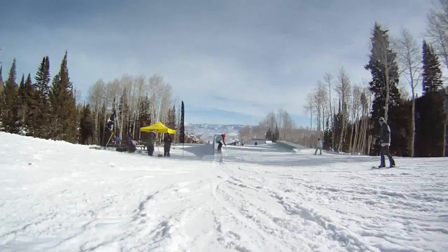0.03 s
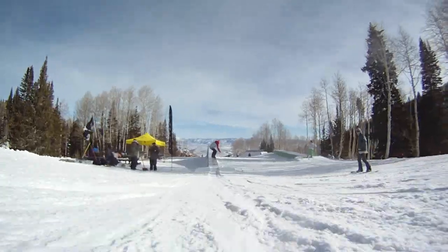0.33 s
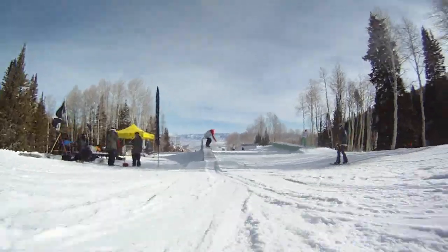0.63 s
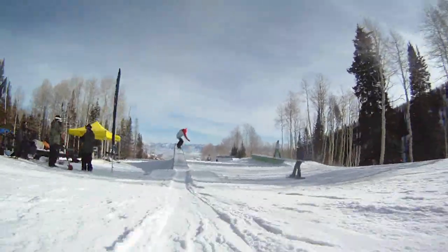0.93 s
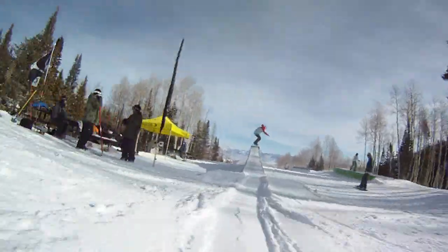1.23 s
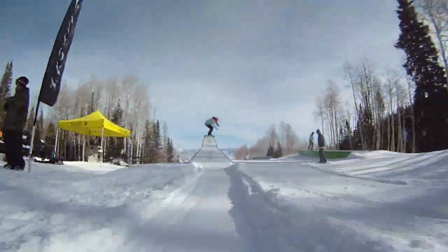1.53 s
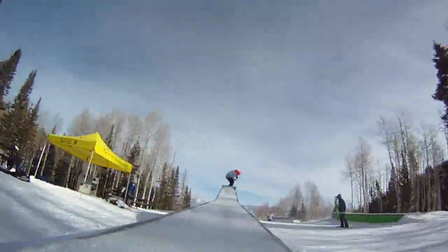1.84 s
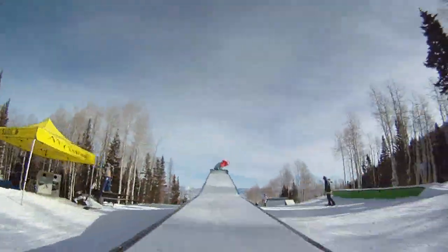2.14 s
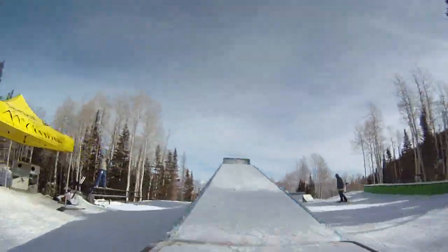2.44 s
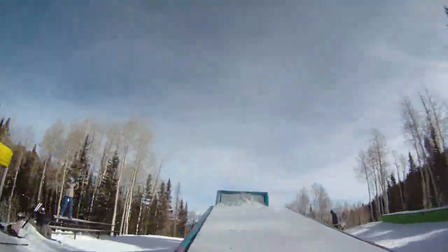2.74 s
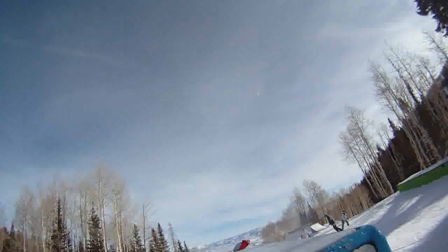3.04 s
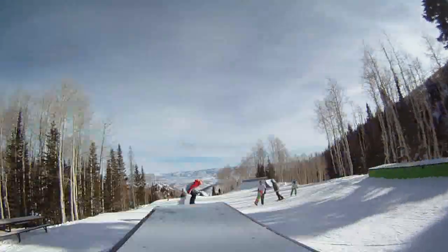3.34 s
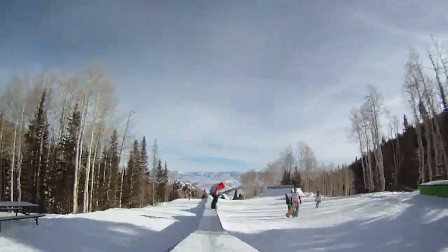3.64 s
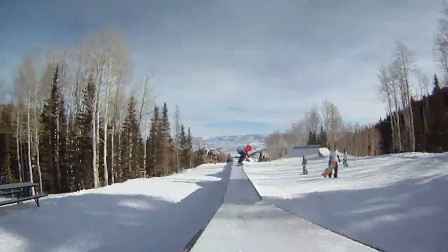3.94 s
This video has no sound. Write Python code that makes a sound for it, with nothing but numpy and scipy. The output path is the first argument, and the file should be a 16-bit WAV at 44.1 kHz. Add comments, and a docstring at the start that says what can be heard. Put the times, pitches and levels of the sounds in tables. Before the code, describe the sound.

Gritty, hollow scraping of a snowboard is heard up close through a plastic housing, over low wind and rattling bumps. Sharp knocks mark a ramp, snow crumbs tick during a short flight, and a distorted landing leads into more sliding.

```python
"""A snowboard scrapes over packed snow, runs up a ramp, flies briefly and drops onto a box.
It carries a camera in a sealed plastic housing, and everything is heard through that shell, almost mono.
Snow grains rasp along the base and ring the housing; loose crumbs tap it; bumps shake the mount;
wind buffets underneath. Hard knocks at the ramp's edges and at the landing overload the recorder."""
import sys
import numpy as np
from scipy import signal
from scipy.fft import rfft, irfft
from scipy.io import wavfile
from scipy.ndimage import uniform_filter1d

SR = 44100
rng = np.random.default_rng(int(sys.argv[2]) if len(sys.argv) > 2 else 0)


def master_out(mix):
    """Clip the mix to full scale and print it as 16-bit PCM to the path in sys.argv[1]."""
    frames = np.transpose(np.atleast_2d(mix))
    ceiling = np.clip(frames, -1, 1)
    pcm = np.round(ceiling * 32767).astype(np.int16)
    wavfile.write(sys.argv[1], SR, pcm)


N = 176400
T = np.arange(N) / SR


def amp(db):
    """Decibels to gain."""
    return 10 ** (np.asarray(db) / 20)


def unit(x):
    """Scales to rms 1."""
    return x / np.sqrt(np.mean(x ** 2) + 1e-20)


def curve(rows, column=1):
    """One column of a time table, drawn as an automation line."""
    rows = np.asarray(rows)
    return np.interp(T, rows[:, 0], rows[:, column])


def add(mix, start_s, sound):
    """Mixes a sound in at its start time."""
    part = mix[round(start_s * SR):][:len(sound)]
    part += sound[:len(part)]


def response(spectrum, modes=(), size=8192):
    """Minimum-phase impulse response, energy 1, of a broad spectrum with resonances on top."""
    hz = abs(np.fft.fftfreq(size, 1 / SR))
    point_hz, point_db = np.transpose(spectrum)
    db = np.interp(np.log(hz + 1), np.log(point_hz + 1), point_db)
    for centre, width, lift in modes:
        db = db + lift / (1 + ((hz - centre) / width) ** 2) ** 2
    minimum_phase = np.exp(signal.hilbert(np.log(amp(db))).conj())
    impulse = np.fft.ifft(minimum_phase).real[:size // 2] * np.hanning(size)[size // 2:]
    return impulse / np.linalg.norm(impulse)


def through(x, impulse):
    """Passes a sound through an impulse response."""
    return signal.fftconvolve(x, impulse)[:len(x)]


def coloured_noise(spectrum):
    """A noise bed with the given tone colour."""
    return through(rng.standard_normal(N), response(spectrum))


def wander(rate_hz):
    """Random modulation, rms 1, rolling off above the rate."""
    hz = np.fft.rfftfreq(N, 1 / SR)
    band = (hz > rate_hz / 10) / np.sqrt(1 + (hz / rate_hz) ** 4)
    return unit(irfft(rfft(rng.standard_normal(N)) * band, N))


def steady(x, window):
    """Holds the running level of a noise near rms 1; the window is in samples."""
    power = uniform_filter1d(uniform_filter1d(x ** 2, window), window)
    return x / np.sqrt(abs(power) + 1e-12)


def burst(t, rise_s, hold_until_s, fall_s):
    """Envelope with a linear attack and an exponential tail."""
    return np.minimum(t / rise_s, 1) * np.exp(-np.maximum(t - hold_until_s, 0) / fall_s)


def plastic_housing(damping=0):
    """Impulse response of the hollow shell; damping, 0 to 1, flattens its resonances."""
    # broad tone of the shell (frequency [Hz], level [dB])
    tone = [(60, -15), (250, -18.5), (480, -21.5), (800, -5.5), (1700, -5.5), (2900, -10.5), (3450, -18),
            (4300, -26), (6100, -42.5), (7700, -31), (9000, -20.5), (11000, -22), (11600, -41),
            (12400, -29), (12900, -18.5), (14700, -39.5), (15600, -47)]
    # its resonances (frequency [Hz], width [Hz], lift [dB])
    modes = [(280, 22.6, 16.8), (653, 101, 17.7), (1003, 79, 9.1), (1162.7, 158, 13.1), (2494, 227, 10.07),
             (3700, 136, 16.5), (5270, 110, 3), (6760, 82, 1.8), (8300, 117, 15.9), (9524, 224, 11.6),
             (10870, 190, 9.5), (12000, 140, 3.2), (13570, 250, 9.2), (15100, 200, 2.4)]
    return response(tone, [(hz, width, lift * (1 - damping)) for hz, width, lift in modes])


def flutter():
    """A faint low flutter that widens the rumble."""
    # low-mid hump (frequency [Hz], level [dB])
    tone = [(30, -57), (150, -3.5), (420, 18), (700, 0), (1100, -47), (3000, -60)]
    return amp(-61.5) * coloured_noise(tone)


def air():
    """Air hisses past one side of the housing, strongest in flight."""
    # colour of the slipstream (frequency [Hz], level [dB])
    tone = [(25, -2.5), (100, -10), (450, -16), (1000, -23), (4000, -37), (6500, -49), (10500, -34),
            (14000, -49)]
    # its swell (time [s], level [dB])
    swell = [(0, -90), (.2, -70), (3.12, -52), (3.2, -36), (3.46, -38.5), (3.52, -65), (4, -64)]
    return coloured_noise(tone) * amp(curve(swell))


def wind():
    """Gusts buffet the housing with a deep rumble."""
    # colour of the buffeting (frequency [Hz], level [dB])
    tone = [(8, -11), (20, 7.5), (40, -1), (60, -17), (100, -13.5), (300, -50.5), (2000, -125)]
    # gusts (time [s], relative level [dB])
    gusts = [(0.0, -107), (0.21, -30.5), (0.62, -14.5), (1.16, -18.5), (1.28, -10.5), (1.35, -28),
             (1.5, -16), (2.04, -12.5), (2.06, -19.5), (2.67, -30.5), (3.02, -20), (3.15, -9), (3.5, -21),
             (3.64, -32), (3.68, -18), (4.0, -24)]
    return steady(coloured_noise(tone), window=4000) * amp(curve(gusts) - 2.23)


def mount_shake():
    """Bumps in the snow keep the camera mount drumming in uneven jolts."""
    # boom of the mount (frequency [Hz], level [dB])
    tone = [(40, -30.5), (70, -12.5), (98, 1), (125, 4), (160, -10.5), (220, -25.5), (290, -27.5),
            (450, -37), (900, -68.5), (3000, -130)]
    # shaking, one list per stretch of the ride (time [s], relative level [dB])
    bumps = [
        [(0.15, -39), (0.234, -49), (0.262, -28), (0.86, -16.5), (0.884, -10.5), (0.964, -15), (1.148, -12.5),
         (1.212, -33.5), (1.25, -20)],
        [(1.27, -23), (1.294, -17.5), (1.39, -33.5), (1.472, -29), (1.49, -18.5), (1.656, -29), (1.7, -10.5),
         (1.96, -22), (2.02, -10.5)],
        [(2.07, -15.5), (2.114, -42), (2.244, -8), (2.268, -30), (2.314, -23.5), (2.392, -22.5), (2.456, -18.5),
         (2.612, -19.5), (2.68, -16.5)],
        [(2.74, -19.5), (2.79, -55), (2.87, -13), (2.942, -29.5), (3.064, -16.5), (3.188, -21.5), (3.21, -20.5),
         (3.372, -39), (3.47, -21)],
        [(3.54, -41), (3.572, -26), (3.636, -42), (3.652, -35), (3.754, -17.5), (3.78, -34.5), (3.904, -23),
         (3.92, -14.5), (4.0, -16.5)],
    ]
    drum = steady(coloured_noise(tone), window=1500)
    jolts_db = 4.24 * wander(rate_hz=8.6)
    return drum * amp(curve(np.concatenate(bumps)) + jolts_db - 1.78)


def snow_crumbs(housing):
    """Flying crumbs of snow hit the housing as tiny bright taps."""
    # taps (time [s], peak [dB])
    taps = [(2.131, -38), (2.164, -37), (2.744, -42), (3.184, -26), (3.201, -14), (3.257, -19.5),
            (3.269, -18), (3.335, -23), (3.357, -21), (3.363, -25), (3.365, -26), (3.421, -23)]
    decay_s, brightness = 0.00048, 0.16
    lowpass = signal.butter(2, 5500, fs=SR)
    t = T[:SR // 20]
    track = np.zeros(N)
    for start_s, peak_db in taps:
        tick = rng.standard_normal(len(t)) * np.exp(-t / decay_s)
        tap = through(tick, housing) + brightness * signal.lfilter(*lowpass, tick)
        add(track, start_s, amp(peak_db) * tap / abs(tap).max())
    return track


def knock(housing, crack_db, crack_s, ring_db, thump_db):
    """A short crunch rings the housing; just after it the blow swings the mount for a few cycles."""
    ring_hz, ring_width_hz = 1173.5, 380
    thump_hz, lag_s, push_s, tail_t60_s = 110, 0.00067, 0.0082, 0.11
    t = T[:SR // 5]
    contact = burst(t, rise_s=0.0015, hold_until_s=crack_s, fall_s=0.00079)
    crunch = contact * rng.standard_normal(len(t))
    crack = through(crunch, housing) + 0.04 * crunch  # a little raw crunch for edge
    swell = burst(t, rise_s=crack_s / 2, hold_until_s=0.47 * crack_s, fall_s=1 / (np.pi * ring_width_hz))
    ring = swell * np.sin(2 * np.pi * ring_hz * t)
    late = np.maximum(t - lag_s, 0)
    swing = np.exp(-(late / push_s) ** 4) + 0.38 * amp(-60 * late / tail_t60_s)
    thump = swing * np.sin(2 * np.pi * thump_hz * late)
    return amp(crack_db) * crack + amp(ring_db) * ring + amp(thump_db) * thump


def board_knocks():
    """Blows travel through the board into the damped housing; returns mid and a faint side."""
    # blows (time [s], crack [dB], crack length [s], housing ring [dB], mount thump [dB])
    blows = [(0.444, -13.5, 0.0056, -35, -11.5), (0.633, -34, 0.0042, -34, -13.5),
             (1.298, -8, 0.0075, 8, -37), (2.0345, -1, 0.0041, 5, -8.5), (2.2327, 2.5, 0.0045, -12, 2),
             (2.688, -20.5, 0.0057, -32, -10), (2.711, -8.5, 0.0025, -22, 0),
             (2.8637, -15.5, 0.0029, -11.5, -6), (3.21, -30, 0.0064, -45, -12),
             (3.4881, 7.5, 0.0021, 3, 6.5), (3.7603, -7, 0.0041, 2.5, -23)]
    housing = plastic_housing(damping=0.46)
    mid, side = np.zeros((2, N))
    for start_s, *blow in blows:
        add(mid, start_s, knock(housing, *blow))
        add(side, start_s, amp(-35) * rng.choice([-1, 1]) * knock(housing, *blow))
    return mid, side


def board_pressure():
    """The chattering board presses unevenly on the snow; returns gains for the scrape's body and rasp."""
    # scraping along each stretch of the ride (time [s], relative rasp [dB], relative hollow body [dB])
    run_in = [(0.14, -50, -40), (0.226, -42, -47.5), (0.236, -38.5, -40.5), (0.388, -26.5, -31.5),
              (0.43, -30, -25), (0.444, -21.5, -28), (0.472, -30, -23.5), (0.514, -30.5, -39),
              (0.642, -21.5, -15), (0.658, -31, -33), (0.786, -22.5, -12.5), (0.886, -15, -14),
              (0.92, -30, -24), (1.004, -17.5, -13), (1.072, -23, -18), (1.1, -14, -18),
              (1.184, -22.5, -18), (1.29, -20, -11.5)]
    approach = [(1.315, -25.5, -26), (1.367, -23, -20.5), (1.419, -26, -24.5), (1.709, -17.5, -19.5),
                (1.725, -23.5, -20), (1.757, -25.5, -25), (1.773, -25.5, -37), (1.807, -22.5, -17),
                (1.931, -20.5, -26), (1.967, -21.5, -16), (1.983, -12.5, -32), (2.028, -23.5, -27)]
    ramp_foot = [(2.048, -33.5, -27), (2.104, -40.5, -30), (2.134, -51, -25), (2.152, -58, -38),
                 (2.166, -42, -25.5), (2.222, -53, -39)]
    ramp = [(2.25, -47, -38), (2.268, -39.5, -37.5), (2.458, -28, -26), (2.554, -14.5, -15.5),
            (2.594, -22, -17), (2.616, -13, -12), (2.634, -24, -26.5), (2.684, -18.5, -9),
            (2.705, -44, -43)]
    lip = [(2.725, -49, -34), (2.747, -46.5, -50), (2.843, -41.5, -37.5), (2.867, -20, -27),
           (2.877, -33.5, -33.5), (2.991, -31, -29), (3.049, -19.5, -23), (3.073, -28.5, -24),
           (3.117, -20, -19.5), (3.329, -61.5, -48.5), (3.357, -31.5, -36), (3.397, -79, -39),
           (3.429, -44, -29.5), (3.478, -54, -32)]
    box = [(3.505, -32, -32), (3.533, -47.5, -58), (3.563, -39, -40), (3.603, -38, -56),
           (3.637, -25.5, -31.5), (3.755, -20.5, -21), (3.765, -27, -9), (3.775, -25.5, -27),
           (3.955, -41, -20), (4.0, -39, -26)]
    # the edge bites through ridges of snow (time [s], hollow body [dB], rasp [dB])
    scuffs = [(.309, -43, -43), (0.379, -29, -17), (0.674, -22, -23.5), (0.717, -18, -33),
              (0.771, -14, -18), (1.753, -15.5, -23), (1.959, -18, -12), (2.108, -26, -52),
              (2.128, -22, -36), (2.161, -43, -51), (2.611, -24, -16.5), (2.669, -22, -22),
              (3.039, -18, -14), (3.089, -21, -25), (3.121, -22, -23), (3.428, -47, -19), (3.641, -27, -23),
              (3.723, -20, -21), (3.956, -16.5, -38)]
    ride = np.concatenate([run_in, approach, ramp_foot, ramp, lip, box])
    chatter_db = 2.0 * wander(rate_hz=82.7)
    body_gain = amp(curve(ride, column=2) + chatter_db - 4.5)
    rasp_gain = amp(curve(ride, column=1) + chatter_db - 1)
    bite = burst(T[:SR // 20], rise_s=0.0036, hold_until_s=0.0016, fall_s=0.0054)
    for start_s, body_db, rasp_db in scuffs:
        add(body_gain, start_s, amp(body_db) * bite)
        add(rasp_gain, start_s, amp(rasp_db) * bite)
    return body_gain, rasp_gain


def snow_scrape(housing):
    """Dense grains crushed under the base ring the housing: a hollow body below, a gritty rasp above."""
    # treble shelf on the rasp, brighter at the ramp's foot and the box's end (time [s], gain [dB])
    shelf = [(0, -2.5), (.8, 0.5), (1.25, 0), (1.4, -0.5), (2.0, -0.5), (2.15, 5.5), (2.45, -1.5), (2.7, 0),
             (3.1, -1), (3.5, -1), (3.7, -2), (4, 7.5)]
    grains_per_s, spread_db, grain_share = 1800, 2.5, 0.31
    split_hz, sizzle_hz = 1370, 6150
    body_gain, rasp_gain = board_pressure()
    sizes = amp(spread_db * np.minimum(rng.exponential(1, N), 5))
    grains = sizes * rng.choice([-1, 1], N) * (rng.random(N) < grains_per_s / SR)
    hiss = rng.standard_normal(N)
    crush = through(np.sqrt(grain_share) * unit(grains) + np.sqrt(1 - grain_share) * hiss, housing)
    body = signal.sosfiltfilt(signal.butter(2, split_hz, fs=SR, output="sos"), crush)
    rasp = unit(crush - body)
    sizzle = signal.sosfiltfilt(signal.butter(3, sizzle_hz, "high", fs=SR, output="sos"), rasp)
    rasp = rasp + sizzle * (amp(curve(shelf)) - 1)
    return unit(body) * body_gain + rasp * rasp_gain


def scene():
    """The ride sits in the centre; flutter, a trace of the knocks and each side's own air add width."""
    start_s, fade_in_s = 0.15, 0.023
    housing = plastic_housing()
    sliding = np.clip((T - start_s) / fade_in_s, 0, 1)
    mid = (snow_scrape(housing) + mount_shake()) * sliding + wind()
    side = flutter() * sliding
    knocks_mid, knocks_side = board_knocks()
    mid += knocks_mid + snow_crumbs(housing)
    side += knocks_side
    return np.array([mid + side + air(), mid - side + air()])


def record(dry):
    """A limiter too slow for the knocks, hard clipping, a DC blocker that tilts the flat tops, a high cut."""
    threshold_db, slope, attack_s, release_db_per_s = -10, 0.63, 0.014, 200
    dc_block_hz, high_cut_hz = 4.4, 15900
    pole = np.exp(-1 / (attack_s * SR))
    power = signal.lfilter([1 - pole], [1, -pole], np.clip(dry[0], -1, 1) ** 2)
    release_db = T * release_db_per_s
    held_db = np.maximum.accumulate(10 * np.log10(power + 1e-12) + release_db) - release_db
    limited = dry * amp(-slope * np.maximum(held_db - threshold_db, 0))
    clipped = np.clip(limited, -1, 1)
    tilted = signal.lfilter(*signal.butter(1, dc_block_hz, "high", fs=SR), clipped)
    high_cut = signal.firwin(255, high_cut_hz, window=("kaiser", 8), fs=SR)
    return signal.oaconvolve(tilted, high_cut[None], "same")


dry = scene()
out = record(dry)
master_out(out)
```